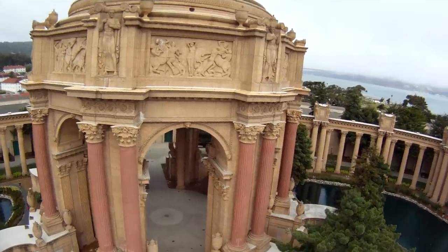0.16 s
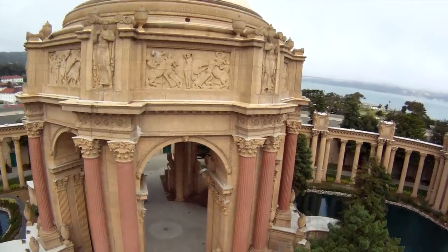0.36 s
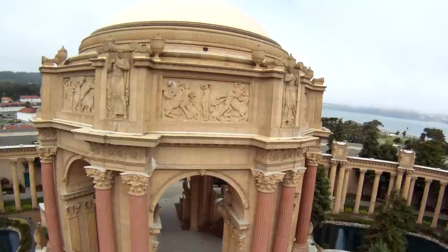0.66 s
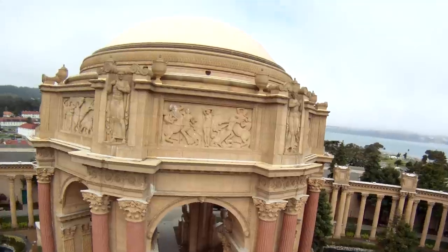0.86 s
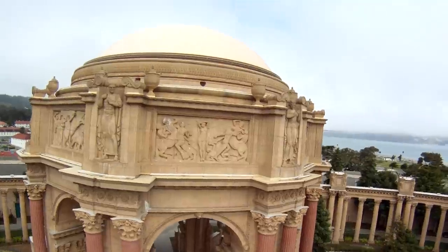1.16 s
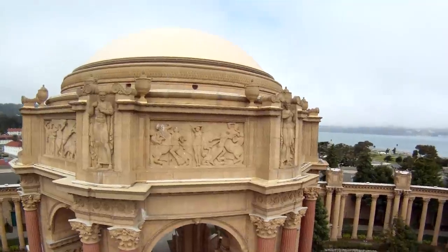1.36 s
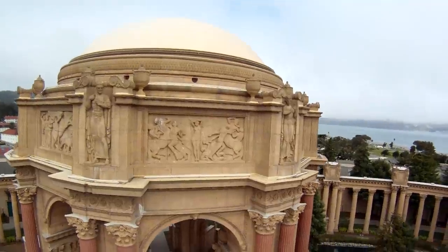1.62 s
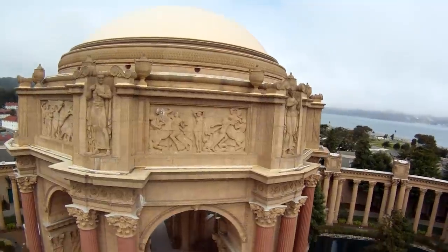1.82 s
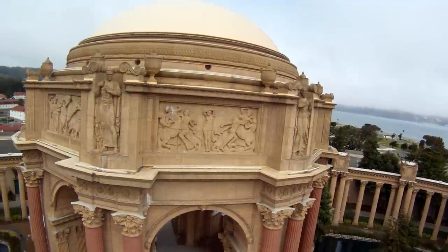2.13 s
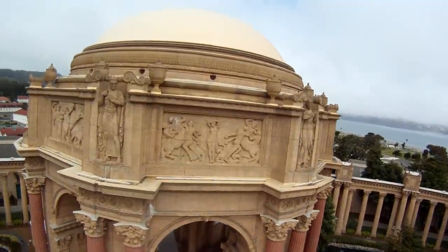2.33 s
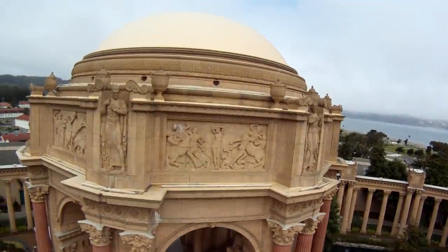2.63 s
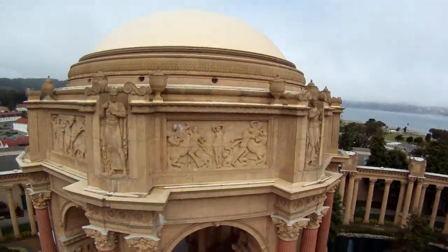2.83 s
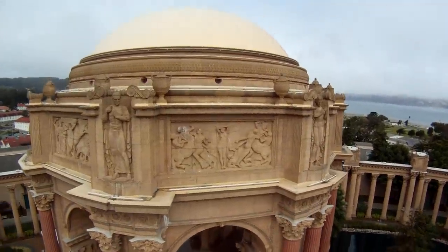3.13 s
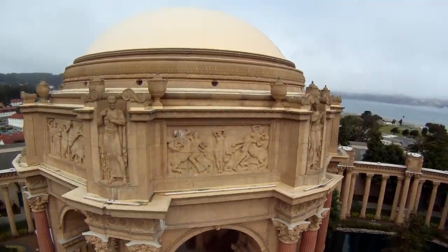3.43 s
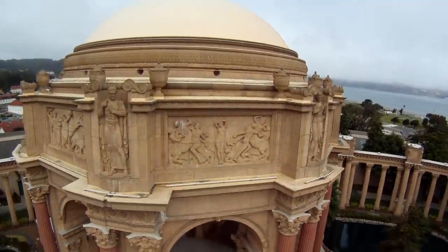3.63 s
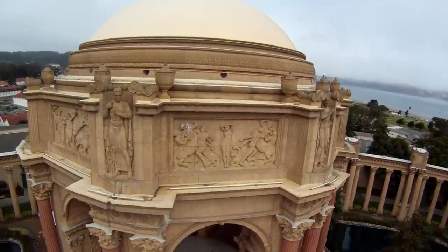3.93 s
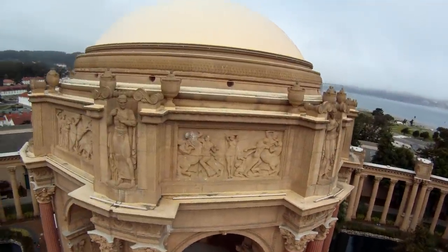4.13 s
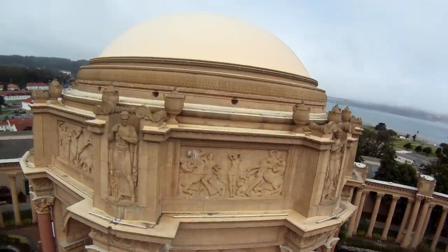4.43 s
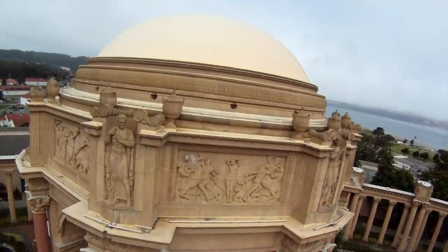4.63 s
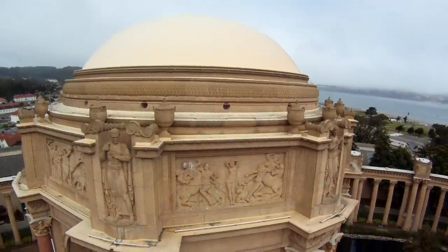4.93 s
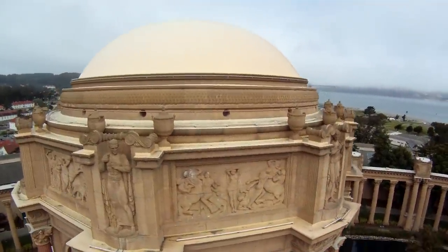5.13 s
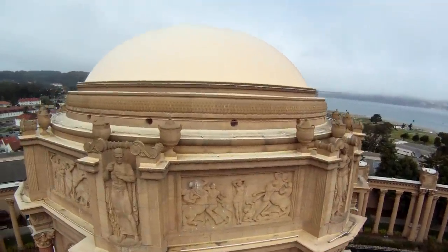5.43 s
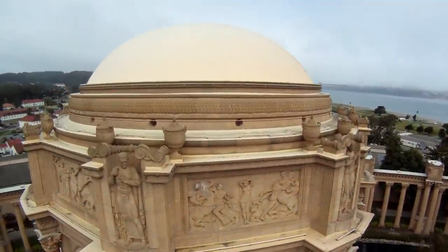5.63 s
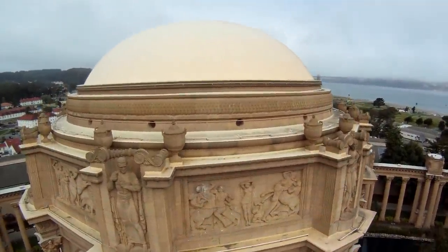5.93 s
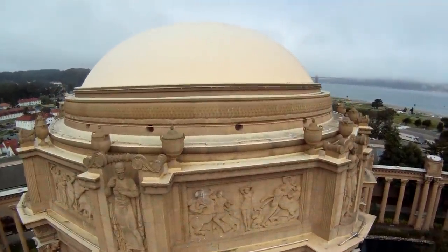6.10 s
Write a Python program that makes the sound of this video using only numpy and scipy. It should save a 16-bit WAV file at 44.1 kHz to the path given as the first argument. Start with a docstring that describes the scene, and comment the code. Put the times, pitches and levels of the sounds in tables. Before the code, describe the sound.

A small drone's motors buzz and whine close by in lulls, while heavy wind rumbles, throbs and thumps over the microphone, increasingly continuous later.

```python
"""Rotor downwash and gusts buffet the microphone of a small camera under a multirotor drone: pulse trains throb at
the rotor rate, random pulses make eddies, thumps and snaps, and filtered noise makes rumble. Motors buzz through
the airframe as noise in resonators, with blade hum and winding whine as sines; blade hiss is shaped noise.
The camera's gain control ducks under the wind and recovers in the lulls, where the motors come forward. Its slow
sample-and-hold mirrors the whole sound around the sampling rate."""
import sys
import numpy as np
from scipy import signal
from scipy.fft import rfft, irfft, next_fast_len
from scipy.io import wavfile
from scipy.ndimage import uniform_filter1d

SR = 44100
rng = np.random.default_rng(int(sys.argv[2]) if len(sys.argv) > 2 else 0)


def dump_mix(stems):
    """Bounce the given channels to the path in sys.argv[1] as a 16-bit WAV at rate SR."""
    frames = np.atleast_2d(stems).T  # one column per channel
    limited = np.clip(frames, -1, 1)  # hard clip at full scale
    pcm = np.round(limited * 32767).astype(np.int16)
    wavfile.write(sys.argv[1], SR, pcm)


N = 276056

# Pressure spectrum of one eddy: f/Hz, relative level/dB
EDDY_SPECTRUM = [(20, -24), (60, -17), (150, -3.5), (260, -2), (370, -6.5), (740, -33), (1100, -46.5),
                 (1600, -58.5), (6000, -85)]


def wake(turns, jitter=0.037, scatter_db=0.9, lean=-0.44):
    """Periodic pulse train: one suction pulse per rotor turn, with random timing (in mean periods) and size."""
    # Pressure spectrum of one wake pulse: f/Hz, relative level/dB
    pulse_spectrum = [(30, -26), (80, 7), (118, 2.5), (236, -5.5), (354, -17.5), (472, -23), (708, -32),
                      (1500, -77), (6000, -110)]
    at = np.flatnonzero(np.diff(np.floor(turns)))
    timing, sizes = rng.standard_normal((len(at), 2)).T
    period = np.mean(np.diff(at))
    at = np.clip(at + jitter * timing * period, 0, N - 1).astype(int)
    clicks = np.zeros(N)
    clicks[at] = -undb(scatter_db * sizes)
    clicks -= clicks.mean()
    return undb(-0.5) * unit(shape(clicks, pulse_spectrum, lean))


def eddies(rate=380., spread_db=1.29, suction=.7, lean=-0.33):
    """Shot noise: eddies strike at random, rate per second, most of them as suction and a few much larger."""
    strike, size, way = rng.random((N, 3)).T
    sizes = undb(-spread_db * np.log(1 - size))  # exponential spread in dB
    signed = sizes * np.where(way < suction, -1, 1)
    clicks = (strike < rate / SR) * signed
    turbulence = unit(shape(clicks - clicks.mean(), EDDY_SPECTRUM, lean))
    return turbulence * undb(0.5 + 0.76 * walk(22))


def thumps(lean=-0.46):
    """Impulse response: each of the largest eddies sucks or pushes as one pulse of the eddy spectrum."""
    # The largest eddies: t/s, peak level/dB, sign (1 pushes, -1 sucks)
    largest = [(0.089, 3, 1), (0.174, 21, -1), (0.238, 16, 1), (0.314, 14, -1), (0.414, 12, -1),
               (0.467, 9, -1), (0.757, 10, 1), (0.769, 16.5, -1), (0.889, 8.5, -1), (0.996, -8, 1),
               (1.101, -10, -1), (1.139, -3.5, 1), (1.154, 10, -1), (1.372, -2.5, -1), (1.479, -10, -1),
               (1.587, -11.5, -1), (1.607, -4, 1), (1.641, 3.5, -1), (1.701, -4, 1), (1.727, -14.5, -1),
               (1.751, 15, -1), (1.827, 12.5, -1), (1.998, 12.5, -1), (2.295, 12.5, -1), (2.393, 11, -1),
               (2.739, 8.5, -1), (2.84, 4, 1), (2.874, 13, -1), (3.083, 16.5, -1), (3.26, 15, -1),
               (3.447, 18.5, -1), (3.733, 12, -1), (3.816, 13, -1), (4.169, 10, -1), (4.237, 14.5, -1),
               (4.353, 20.5, -1), (4.407, 19, -1), (4.576, 7.5, -1), (5.212, 27, -1), (5.642, 0.5, 1),
               (5.862, -3.5, -1), (5.887, 7.5, -1), (5.909, 12.5, -1), (6.046, 9, -1)]
    s, db, way = np.transpose(largest)
    one_pulse = shape(np.eye(1, 4096)[0], EDDY_SPECTRUM, lean)
    clicks = strikes(s, np.sign(way) * undb(db))
    return shape(clicks, EDDY_SPECTRUM, lean) / np.abs(one_pulse).max()


def snaps(hz=630.0, width=450.0):
    """Damped resonance: small quick eddies last a cycle or two, higher than the thumps."""
    # Sharp snaps of air at the microphone hole: t/s, peak level/dB
    snap_times = [(0.295, -14.5), (0.367, -4.5), (0.465, -9), (0.594, -6), (0.795, -5), (1.345, -24),
                  (2.384, 1), (2.668, -12), (2.836, -15.5), (3.182, -12.5), (3.255, -10), (3.547, -3),
                  (3.903, -13), (3.978, -1), (4.164, -1), (4.224, -6), (4.457, 1.5), (4.574, 1.5),
                  (4.834, -1), (4.965, -1), (5.057, 4.5), (5.344, 6.5), (5.881, -14), (6.085, -10)]
    s, db = np.transpose(snap_times)
    one_snap = band(band(np.eye(1, 4096)[0], hz, width), hz, width)
    ringing = band(band(strikes(s, undb(db)), hz, width), hz, width)
    return -ringing / np.abs(one_snap).max()


def rumble():
    """Low-frequency turbulence: slow gusts press on the case, as noise in one broad low resonance."""
    return undb(1.0) * unit(band(rng.standard_normal(N), 77.6, 134.0))


def motors(turns, hum_db, upper_db, throb=0.61, flicker_db=3.5):
    """Forced resonance: shaking that throbs once a turn rings the frame; two blades hum at twice the rotor rate."""
    # Airframe resonances: f/Hz, width of one filter pass/Hz, relative level/dB
    frame_modes = [(457, 92, 0.5), (706, 57, -12), (965, 83, -4), (1160, 49, -7), (1216, 81, -1),
                   (1380, 170, -22), (2114, 71, -7), (2275, 190, -10.5), (2493, 148, -6), (3380, 1200, -31)]
    # Rough tones that beat in the frame: f/Hz, level/dB before flicker
    beat_tones = [(1140, -4.5), (1190, -4.5), (1245, -14)]
    push = (1 + throb * np.cos(2 * np.pi * turns)) * undb(1.66 * walk(60))
    ring = np.zeros(N)
    for hz, width, db in frame_modes:
        level = undb(db + flicker_db * walk(11))
        mode = level * band(push * rng.standard_normal(N), hz, width)
        ring += mode * (undb(upper_db) if hz > 1800 else 1)
    blade_phase = 2 * np.pi * (2 * turns + 0.044 * walk(25))
    hum = np.sin(blade_phase) + undb(-14.0) * np.sin(2 * blade_phase)
    beats = sum(undb(db) * waver(hz, .018, flicker_db=3.0) for hz, db in beat_tones)
    return undb(4.0) * unit(ring) + undb(hum_db) * unit(hum) + beats + whines()


def whines(octave_db=20.0):
    """Magnetic forcing: poles pass the windings, and the frame rings louder an octave below the first motor."""
    # Winding whine of two motors: t/s, first f/Hz, second f/Hz, level re buzz/dB before flicker
    winding_tones = [(0, 5000, 5500, -20), (1.3, 5050, 5660, -41), (2.4, 4970, 5540, -25),
                     (2.6, 4970, 5500, -27), (3.25, 5040, 5560, -19.5), (3.45, 5110, 5580, -44),
                     (5.5, 5240, 5850, -28), (6.26, 4950, 5600, -29)]
    first_hz, second_hz, db = curves(winding_tones)
    wander, flicker_db = .0035, 2.5
    first = waver(first_hz, wander, flicker_db)
    second = waver(second_hz, wander, flicker_db)
    octave_down = waver(first_hz / 2, wander, flicker_db)
    return undb(db) * (first + second + undb(octave_db) * octave_down)


def waver(hz, wander, flicker_db):
    """Frequency and amplitude modulation: a motor tone wavers as the speed control works."""
    phase = 2 * np.pi * np.cumsum(hz * (1 + wander * walk(14))) / SR
    return undb(flicker_db * walk(30)) * np.sin(phase)


def hiss(turns, throb=0.25):
    """Broadband flow noise: air tears off the blades, fluttering and swelling once a turn."""
    # Propeller hiss as it comes through the camera case: f/Hz, relative level/dB
    case_spectrum = [(820, -44.5), (1400, -26), (1790, -8.5), (1960, -2), (2160, 2.5), (2590, -2.5),
                     (2810, -10), (3670, -7), (3780, -10), (4240, -23), (5260, -13.5), (5900, -26.5),
                     (7670, -65), (13000, -120)]
    flutter = (1 + throb * np.cos(2 * np.pi * turns)) * undb(1.56 * walk(45))
    return undb(7.5) * unit(shape(flutter * rng.standard_normal(N), case_spectrum, lean=0))


def gain_control(x):
    """Peak-holding compression: the loudest recent level sets a smoothed cut, which recovers at a steady pace."""
    aim_db, start_db = -12, 14  # level aimed for; level held at the start
    sense_s, duck_s, recover_db_per_s = 0.0029, 0.0026, 102
    ramp = recover_db_per_s * np.arange(N) / SR
    heard_db = 10 * np.log10(lag(x[0] ** 2, sense_s) + 1e-12)
    # a running maximum against a rising ramp falls back at the ramp's slope
    held_db = np.maximum(np.maximum.accumulate(heard_db + ramp), start_db) - ramp
    gain_db = np.minimum(0, aim_db - held_db)
    return x * undb(lag(gain_db, duck_s))


def undb(db):
    """Decibel definition: amplitude ratio from level."""
    return 10 ** (np.asarray(db) / 20)


def unit(x):
    """Root-mean-square normalization to one."""
    return x / np.sqrt(np.mean(x ** 2))


def curves(table):
    """Linear interpolation: each column of a table as one value a sample."""
    s, *columns = np.transpose(table)
    return [np.interp(np.arange(N) / SR, s, c) for c in columns]


def strikes(s, size):
    """Impulse excitation: a click at each listed moment."""
    clicks = np.zeros(N)
    clicks[(s * SR).astype(int)] = size
    return clicks


def shape(x, spectrum, lean):
    """Linear filtering to a spectrum; a phase lean (radians) makes a pulse fall more steeply than it rises."""
    hz, db = np.transpose(spectrum)
    size = next_fast_len(len(x))
    bins_hz = np.fft.rfftfreq(size, 1 / SR)
    gain = undb(np.interp(np.log(bins_hz + 1), np.log(hz), db))  # straight lines on a log axis
    return irfft(rfft(x, size) * gain * np.exp(1j * lean), size)[:len(x)]


def band(x, hz, width):
    """Second-order resonance, applied twice for dark valleys."""
    b, a = signal.iirpeak(hz, hz / width, SR)
    return signal.lfilter(b, a, signal.lfilter(b, a, x))


def walk(rate):
    """Smoothed random modulation: levels held 1 / rate s, averaged twice, trimmed, then scaled to unit RMS."""
    k = int(SR / rate)
    steps = np.repeat(rng.standard_normal(N // k + 1), k)
    return unit(uniform_filter1d(uniform_filter1d(steps, k), k)[:N])


def lag(x, seconds):
    """Exponential relaxation: one-pole smoothing that starts from the first value."""
    k = np.exp(-1 / (seconds * SR))
    return signal.lfilter([1 - k], [1, -k], x - x[0]) + x[0]


def scene():
    """Superposition: wind pressure and motor sound add at the microphone, ahead of the gain control."""
    # Air on the microphone: t/s, rotor f/Hz, wake throb drive level/dB, eddy drive level/dB
    wind_course = [(0.0, 127.6, -14.5, 11.5), (0.05, 129.4, -24.5, -3.5), (0.09, 129, 3, 6.5),
                   (0.24, 122.3, 10.5, 2.5), (0.26, 120.9, -21, -1.5), (0.31, 118.8, -4.5, 2),
                   (0.4, 118.1, -4, 3), (0.47, 123.1, 4.5, 9.5), (0.6, 133, -1, -0.5),
                   (0.64, 131.6, -32.5, -9), (0.72, 133.4, -31.5, -23), (0.76, 126.3, 11, -3.5),
                   (0.81, 127.2, 5, 1), (0.84, 124.1, -4.5, -17.5), (1.0, 122.4, -36.5, -26.5),
                   (1.13, 120.6, -32.5, -12.5), (1.17, 118.7, -35, -19.5), (1.3, 117.1, -46.5, -24.5),
                   (1.56, 117.5, -30, -22.5), (1.6, 119.1, -23.5, -12), (1.68, 118.8, -23.5, -20),
                   (1.74, 120.2, -12.5, -5), (1.78, 117.7, 5.5, 6), (1.85, 116.5, 9.5, -0.5),
                   (2.4, 118, 9.5, 8), (2.46, 115.3, -1, 0), (2.58, 110.6, -2.5, -9.5),
                   (2.7, 119.2, -4.5, -3), (2.8, 123, -11.5, -3.5), (2.86, 123.3, 0.5, -1.5),
                   (2.96, 118.8, 0, -0.5), (3.1, 119.6, 7, 3.5), (3.15, 122.5, -19.5, -4.5),
                   (3.2, 118.4, -2, -2.5), (3.35, 117.2, 6, 4.5), (3.7, 120.8, -1.5, 5),
                   (3.79, 117.7, 6.5, 7), (3.87, 118.9, 1, 5), (4.0, 114, 6.5, 6.5), (4.15, 112, 6, 9),
                   (4.25, 113.2, 8.5, 5), (4.36, 117.8, 6.5, 10.5), (4.45, 113.5, 17, 5),
                   (4.85, 114.5, 10.5, 3), (4.95, 119.2, 11.5, 0), (5.4, 119.8, 18.5, 10),
                   (5.48, 117.2, 11.5, 4), (5.55, 119.3, -8.5, -6), (5.62, 121, -10.5, -17.5),
                   (5.7, 117, -7, -21), (5.86, 115.2, -22, -18.5), (5.92, 113, 11, 3),
                   (6.08, 113.1, 7, 2.5), (6.15, 117, -17.5, -6.5), (6.26, 117, -9, -14.5)]
    # Motors: t/s, buzz drive level/dB, blade hum level re buzz drive/dB
    motor_course = [(0.0, -28.5, 10.5), (0.4, -32, 6.5), (0.7, -25, 3), (0.93, -31, 8), (1.0, -29.5, 13.5),
                    (1.06, -31, 2.5), (1.12, -28, 15), (1.2, -30.5, 11.5), (1.55, -30.5, 12.5),
                    (1.62, -28, 1.5), (1.76, -29.5, 5.5), (2.0, -27, 9), (2.5, -32.5, 16.5),
                    (3.25, -30.5, 12), (3.4, -36, 2.5), (3.65, -31.5, 13), (4.05, -28.5, 15),
                    (4.2, -30.5, 5), (4.45, -31.5, 18), (5.4, -31.5, 13), (5.8, -31.5, -2.5),
                    (6.26, -31, 16.5)]
    # Rumble: t/s, drive level re eddies/dB
    rumble_course = [(0.0, -5), (0.5, -9.5), (0.7, 1), (1.1, 2.5), (1.3, -3.5), (1.65, 2), (2.0, -7),
                     (2.5, -8.5), (3.2, -6), (4.0, -9), (5.4, -3.5), (5.8, 4), (6.26, -9.5)]
    upper_db = 0.5  # upper frame modes, added to their listed levels
    blade_hiss_db, air_hiss_db = -16, -37  # hiss drive re buzz drive, re eddy drive
    rotor_hz, wake_db, eddy_db = curves(wind_course)
    buzz_db, hum_db = curves(motor_course)
    turns = np.cumsum(rotor_hz * (1 + 0.01224 * walk(12))) / SR
    throb = undb(wake_db + 2.03 * walk(18)) * wake(turns)
    eddy_db = eddy_db + 2.2 * walk(12)
    rumble_db = curves(rumble_course)[0] + 2.2 * walk(15)
    gusts = undb(eddy_db) * (eddies() + undb(rumble_db) * rumble())
    # the two hiss drives add as powers
    hiss_gain = np.hypot(undb(buzz_db + blade_hiss_db), undb(eddy_db + air_hiss_db))
    tearing = hiss_gain * hiss(turns)
    drone = undb(buzz_db) * motors(turns, hum_db + .8 * walk(6.5), upper_db)
    return (throb + gusts + thumps() + snaps() + tearing + drone)[None]


def record(dry):
    """Sampling theorem: after gain control and peak rounding, a slow sample-and-hold leaves mirror images."""
    hold_hz, play_hz, top_hz = 12000, 48000, 15315  # slow rate, finer rate of the held steps, final cutoff
    even = gain_control(dry)
    rounded = even / (1 + (even / 1.02) ** 6) ** (1 / 6)
    rounded -= rounded.mean()
    below_half_rate = signal.ellip(6, .2, 60, hold_hz / 2, fs=SR, output="sos")
    sampled = signal.sosfilt(below_half_rate, rounded)
    # sampling copies the sound to both sides of the rate
    mirrored = sampled * (1 + 2 * np.cos(2 * np.pi * hold_hz * np.arange(N) / SR))
    size = next_fast_len(N)
    hz = np.fft.rfftfreq(size, 1 / SR)
    # the hold weights every copy by its staircase response
    staircase = np.sinc(hz / hold_hz) / np.sinc(hz / play_hz)
    held = irfft(rfft(mirrored, size) * staircase, size)[:, :N]
    return signal.sosfilt(signal.ellip(10, .2, 70, top_hz, fs=SR, output="sos"), held)


dry = scene()
out = record(dry)
dump_mix(out)
```